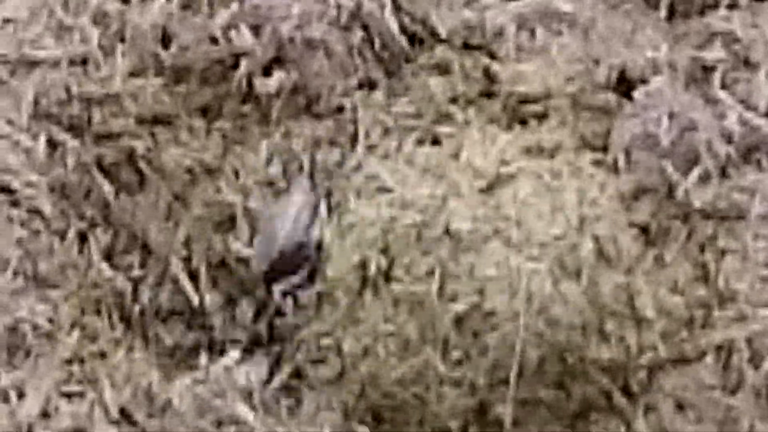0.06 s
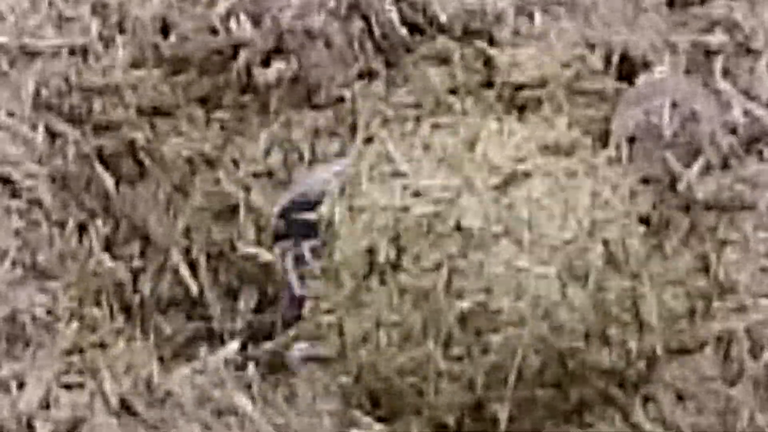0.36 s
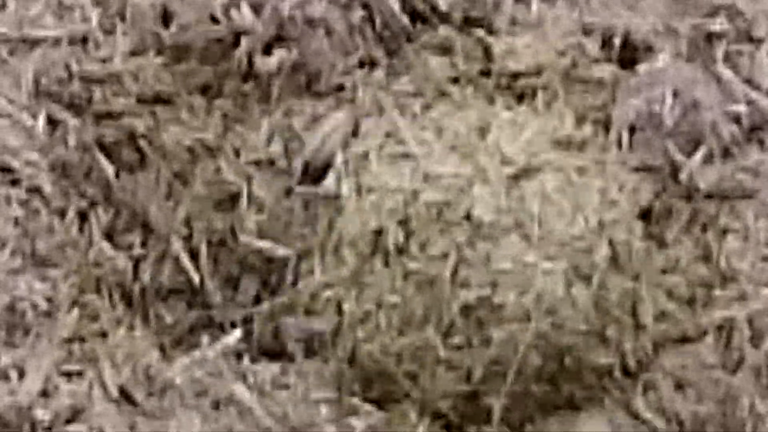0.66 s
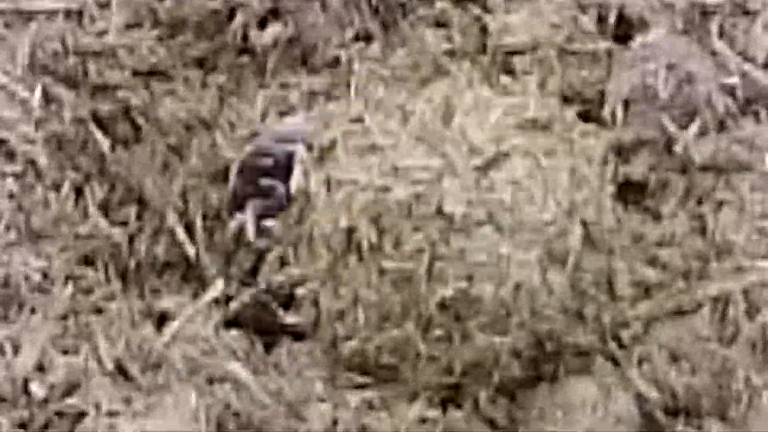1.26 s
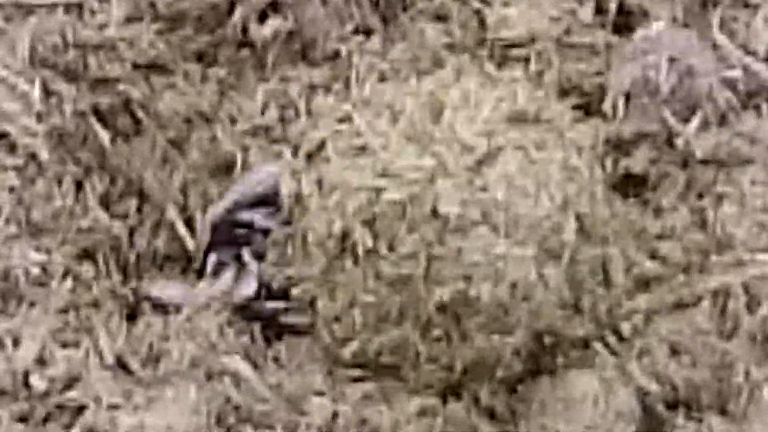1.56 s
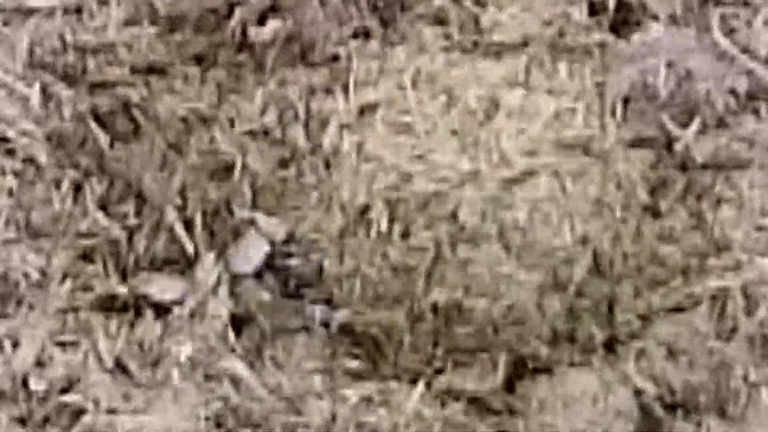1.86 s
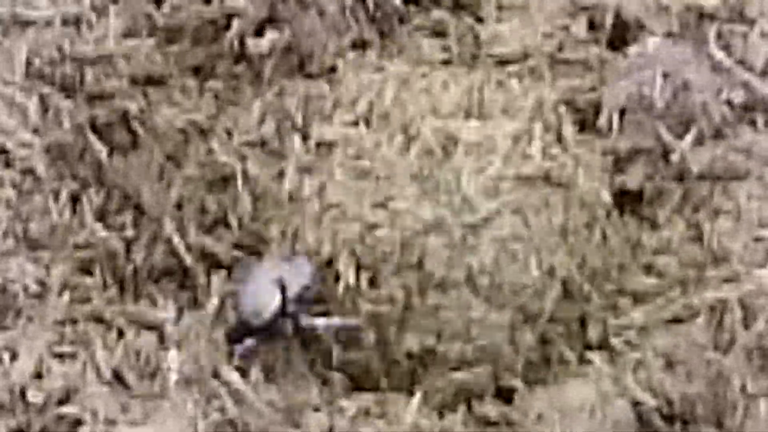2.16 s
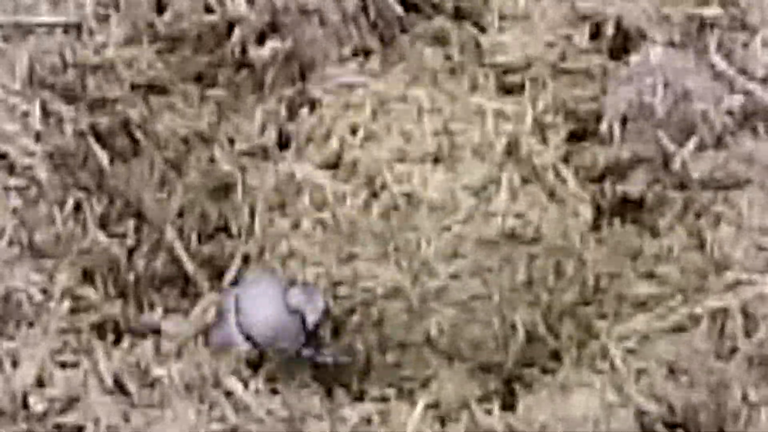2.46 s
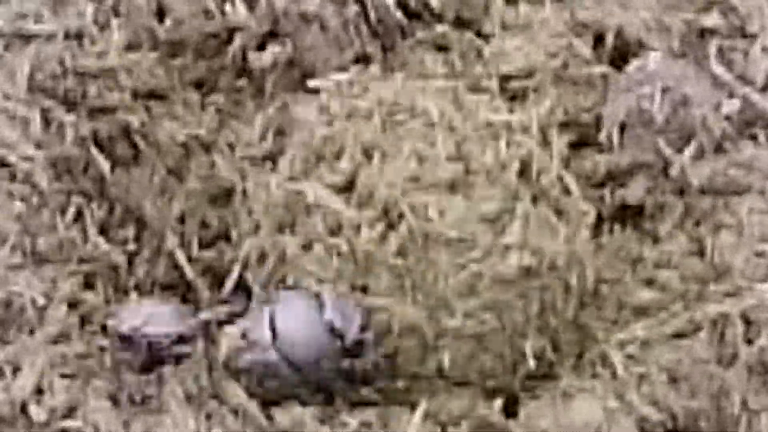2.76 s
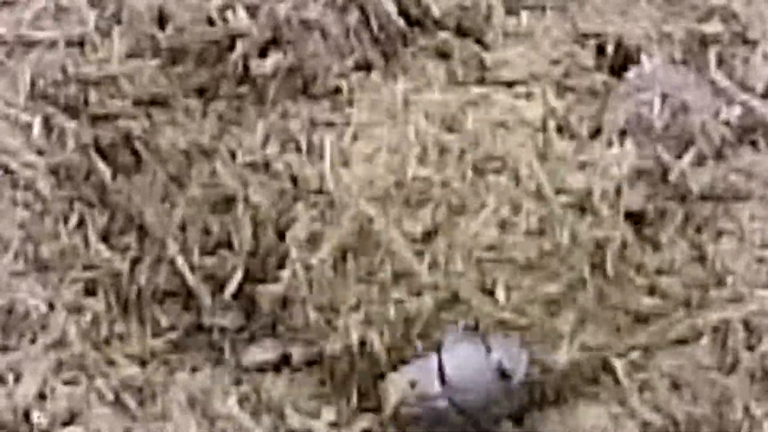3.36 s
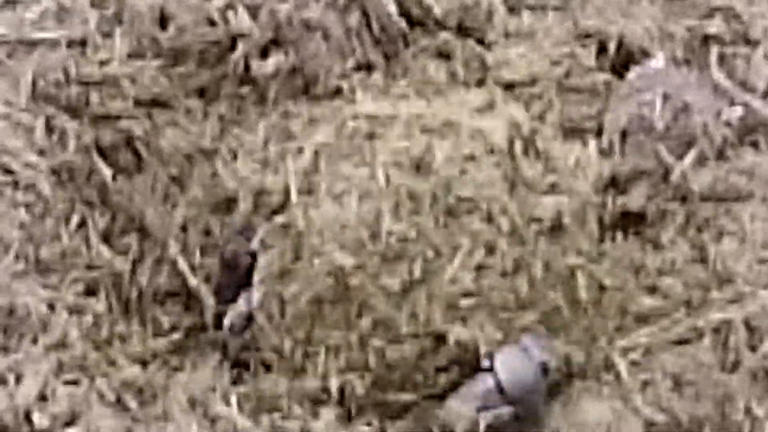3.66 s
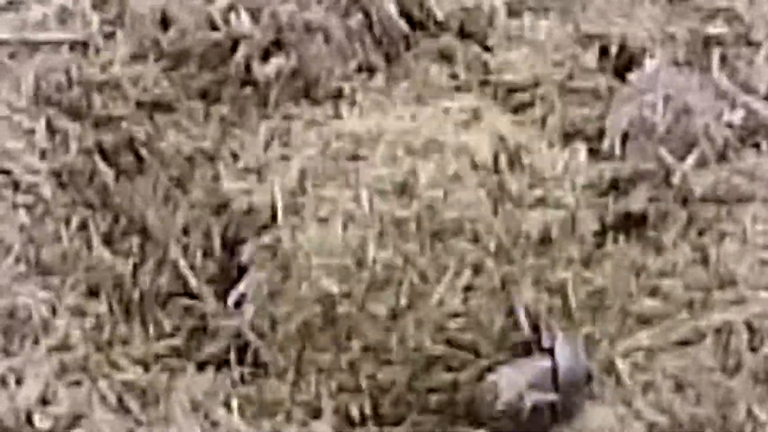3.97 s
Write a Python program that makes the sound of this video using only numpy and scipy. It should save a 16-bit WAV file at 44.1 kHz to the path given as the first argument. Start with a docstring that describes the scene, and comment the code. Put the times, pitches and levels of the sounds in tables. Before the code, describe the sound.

Wind thumps and rumbles on the left of the microphone, starting softly around 1 second, strongest from 2.7 to 3 seconds, then easing. Distant birds whistle and pip faintly over a soft outdoor hiss, with falling whistles from 2.3 seconds and three clearer buzzy chirps near the end. Close by, dry straw snaps lightly at 1.3 and 1.45 seconds, then rustles and crackles from 2.5 to 2.9.

```python
"""Birds and wind over dry ground

Out in the open, distant birds whistle, pip and chirp, their notes scattered by ground and bushes.
Wind thumps on the exposed left side of the microphone in puffs that grow stronger.
Close by, dry straw snaps twice, then rustles and crackles as the stalks rub together.
Under it all lie a soft hiss and the faint stutter of radio interference in the microphone."""
import sys
import numpy as np
from scipy import signal
from scipy.fft import rfft, irfft
from scipy.io import wavfile
from scipy.ndimage import uniform_filter1d

SR = 44100
rng = np.random.default_rng(int(sys.argv[2]) if len(sys.argv) > 2 else 0)


def file_out(sig):
    """Save sig as 16-bit WAV at sys.argv[1]."""
    # one column per channel
    cols = np.atleast_2d(sig).T
    # limit, then scale
    lim = np.clip(cols, -1, 1)
    pcm = np.round(lim * 32767).astype(np.int16)
    wavfile.write(sys.argv[1], SR, pcm)


N = 176400
TIME = np.arange(N) / SR
ECHO_T60_S = 0.35


def amp(db):
    """Decibels to gain."""
    return 10 ** (np.asarray(db) / 20)


def unit(x):
    """Scales to rms 1."""
    return x / np.sqrt(np.mean(x ** 2) + 1e-20)


def pan(left_db):
    """Left and right gains, the left louder by left_db."""
    return amp([[left_db / 2], [-left_db / 2]])


def level(points):
    """Gain over time from rows of time_s, level_db."""
    return amp(np.interp(TIME, *np.transpose(points)))


def shape(points, hz):
    """Gain over frequency from rows of frequency_hz, gain_db."""
    corner_hz, db = np.transpose(points)
    return amp(np.interp(np.log(hz + 1), np.log(corner_hz), db))


def colour(x, points):
    """Gives a signal a spectrum, at rms 1."""
    return unit(irfft(rfft(x) * shape(points, np.fft.rfftfreq(N, 1 / SR)), N))


def wander(rate_hz):
    """Smooth random motion, rms 1."""
    lowpass = np.exp(-(np.fft.rfftfreq(N, 1 / SR) / rate_hz) ** 2)
    return unit(irfft(rfft(rng.standard_normal(N)) * lowpass, N))


def add(mix, start_s, sound):
    """Mixes a sound in at a time, no earlier than zero."""
    part = mix[..., max(round(start_s * SR), 0):][..., :sound.shape[-1]]
    part += sound[..., :part.shape[-1]]


def echo(x, t60_s):
    """Diffuse scatter from ground and bushes, different on each side of the microphone."""
    t = np.arange(SR // 2) / SR
    tail = rng.standard_normal((2, len(t))) * amp(-60 * t / t60_s)
    return signal.fftconvolve(x[None], tail / np.linalg.norm(tail[0]), axes=1)[:, :N]


def open_air():
    """A soft, wide hiss whose level barely moves."""
    hiss_spectrum = [(20, -35), (60, 0), (200, -7.5), (430, -13.5), (1000, -12.5), (1500, -12.5),
                     (3000, -13), (4600, -16), (7000, -15), (9000, -16.5), (12000, -17), (15500, -18)]  # frequency_hz, gain_db
    hiss_level = [(0, -67), (1.1, -68), (1.9, -66), (2.6, -64.5), (3.45, -64.5), (4, -68.5)]  # time_s, level_db
    noise = rng.standard_normal((2, N))
    return colour(noise + 0.033 * noise[::-1], hiss_spectrum) * level(hiss_level)


def distant_chorus():
    """Birdsong from so far off that it blurs into a patchy haze."""
    haze_spectrum = [(1200, -24.5), (2000, -7), (2600, 0.5), (3300, -4.5), (3950, -3), (4500, -49),
                     (8000, -23)]  # frequency_hz, gain_db
    haze_level = [(0, -70.5), (.85, -69), (1.1, -81.5), (1.8, -73.5), (2.5, -71), (3.3, -72), (3.8, -62.5)]  # time_s, level_db
    hz, _, bins = signal.stft(rng.standard_normal((2, N)), SR, nperseg=512)
    patches = uniform_filter1d(rng.standard_normal(bins.shape[1:]), size=3, axis=0)
    patch_db = 5 * unit(uniform_filter1d(patches, size=7, axis=1))
    _, haze = signal.istft(bins * shape(haze_spectrum, hz)[:, None] * amp(patch_db), SR, nperseg=512)
    return level(haze_level) * unit(haze[:, :N])


def bird_note(length_s, pitches_hz, db, swell_db=0, dip_db=0, buzz=0, edge=0.17):
    """A near-sine note gliding through its pitches; any buzz shakes pitch and level, then eases off."""
    buzz_hz, buzz_depth = 208.5, 0.65
    t = np.arange(0, length_s, 1 / SR)
    progress = t / length_s
    drift, flutter = wander(rate_hz=75)[:2 * len(t)].reshape(2, -1)
    shake = buzz * (1 - progress ** 2) * np.sin(2 * np.pi * buzz_hz * t)
    glide = np.polyfit(np.linspace(0, 1, len(pitches_hz)), pitches_hz, len(pitches_hz) - 1)
    hz = np.polyval(glide, progress) * (1 + 0.0054 * drift) + 420 * shake
    envelope = np.sin(np.pi / 2 * np.clip(np.minimum(progress, 1 - progress) / edge, 0, 1)) ** 2
    contour_db = swell_db * progress - dip_db * np.sin(np.pi * progress) ** 2 + 1.8 * flutter
    envelope *= amp(contour_db) * (1 - buzz_depth * shake)
    return amp(db) * unit(envelope * np.sin(2 * np.pi * np.cumsum(hz) / SR))


def nearer_birds():
    """Birds some way off to the left slur, whistle, twitter and chirp, with echoes from the ground."""
    # long falling whistles: start_s, length_s, start_hz, middle_hz, end_hz, level_db, dip_db, swell_db
    slur_notes = [(2.346, .17, 6940, 5630, 4880, -69, 9, -4), (2.665, .135, 6980, 6100, 5100, -67, 0, -9),
                  (2.992, .2, 7020, 5670, 4050, -63.5, 9, 2), (3.341, .192, 6850, 5874, 3940, -53, 5.5, 10)]
    # clear whistles: start_s, length_s, start_hz, middle_hz, end_hz, level_db
    whistle_notes = [(-.03, 0.28, 2134, 2260, 2440, -76), (0.187, 0.13, 3470, 3350, 3070, -73),
                     (0.363, 0.094, 3200, 3180, 3050, -73.5), (0.477, 0.16, 3620, 3560, 3700, -73.5),
                     (1.682, 0.18, 6220, 6730, 7380, -84.5), (1.93, 0.23, 5680, 6940, 7350, -82),
                     (2.387, 0.08, 1390, 1586, 1840, -76), (2.488, 0.057, 4820, 4964, 4800, -59),
                     (2.909, 0.13, 3540, 3280, 3110, -73), (2.982, .053, 4890, 5150, 5050, -57),
                     (3.411, 0.11, 2750, 2736, 2910, -63), (3.485, 0.092, 2790, 2948, 3040, -61),
                     (3.652, 0.0565, 4290, 4140, 4100, -63.5), (3.754, 0.055, 1643, 1990, 2080, -69),
                     (3.862, 0.061, 1720, 1990, 1980, -68.5), (3.933, 0.068, 4600, 5020, 6900, -68)]
    # quick twitters: start_s, length_s, top_hz, fall_hz, level_db
    twitter_notes = [(1.269, 0.051, 4220, 199, -74), (1.317, 0.034, 4410, 600, -74),
                     (1.676, .03, 4150, 150, -77), (1.824, 0.044, 4400, 200, -71.5),
                     (1.881, 0.045, 4504, 50, -68.5), (1.929, .032, 4240, 400, -74),
                     (1.992, 0.026, 4430, 200, -71.5), (2.064, 0.047, 4230, 400, -75),
                     (2.287, 0.079, 3414, 50, -75), (2.385, .021, 5580, 910, -66),
                     (2.601, 0.022, 4080, 650, -61.5), (2.659, 0.01, 4050, 545, -56.5),
                     (3.048, .05, 4500, 774, -66), (3.083, 0.023, 4055, 510, -59.5),
                     (3.152, 0.009, 3850, 550, -60.5)]
    # buzzy falling chirps: start_s, length_s, five times pitch_hz, level_db, swell_db
    chirp_notes = [(3.7, 0.05, 4180, 3780, 3400, 2770, 2760, -50.5, -0.5),
                   (3.82, 0.038, 3630, 3437, 3184, 2860, 2800, -49, -4),
                   (3.931, .041, 3500, 3460, 3043, 2536, 2670, -48, -12)]
    slurs, whistles, chirps, blurred = np.zeros((4, N))
    for start, length, *pitches, db, dip, swell in slur_notes:
        add(slurs, start, bird_note(length, pitches, db, swell_db=swell, dip_db=dip, edge=0.2))
    for start, length, *pitches, db in whistle_notes:
        add(whistles, start, bird_note(length, pitches, db))
    for start, length, top, fall, db in twitter_notes:
        twitter = bird_note(length, (top, top - 0.318 * fall, top - fall), db)
        blur = np.interp(db, [-89.5, -71], [1, 0])  # the fainter, the farther and more diffuse
        add(whistles, start, np.sqrt(1 - blur) * twitter)
        add(blurred, start, np.sqrt(blur) * twitter)
    for start, length, *pitches, db, swell in chirp_notes:
        add(chirps, start, bird_note(length, pitches, db, swell_db=swell, buzz=0.55))
    direct = slurs * pan(9.5) + whistles * pan(13.5) + chirps * pan(10.5)
    song = slurs + whistles + chirps
    diffuse_twitters = echo(blurred, t60_s=0.48)
    early_scatter = amp(-6.5) * echo(song, t60_s=0.08)
    return direct + diffuse_twitters + early_scatter + amp(-13.5) * echo(song, ECHO_T60_S)


def farthest_birds():
    """Faint short notes at random times and pitches, reaching the microphone mostly as echo."""
    count, range_hz, glide_share = 70, (2353, 4244), 0.104
    notes = np.zeros(N)
    for when, height, slope, size in rng.random((count, 4)):
        glide = 1 + glide_share * (2 * slope - 1) * np.array([1, 0, -1])
        pitches = np.interp(height, [0, 1], range_hz) * glide
        add(notes, when * N / SR, bird_note(0.0218 + 0.0293 * size, pitches, db=-90.5))
    return notes + amp(15) * echo(notes, ECHO_T60_S)


def radio_interference():
    """Interference in the microphone: stuttering bursts of even ticks and a thin top-octave sizzle."""
    tick_spectrum = [(100, -5), (220, -4), (430, 2), (900, -2.5), (1400, -5.5), (2500, -15), (5000, -11),
                     (16000, -25)]  # frequency_hz, gain_db
    sizzle_spectrum = [(10700, -23), (11050, -3.5), (11900, -12.5), (12250, -14), (12900, -8), (13450, -17),
                       (13950, -7), (14700, -10), (15050, -4), (15350, -15), (15700, -2)]  # frequency_hz, gain_db
    sizzle_level = [(0, -80), (1.2, -71), (1.9, -63), (2.4, -69.5), (2.9, -71.5), (3.45, -60.5), (4, -76)]  # time_s, level_db
    tick_hz, ticks_per_burst, bursts = 216.67, 4, N * 60 // SR
    rests = 2.9 * rng.choice([0, 1, 1, 2], bursts) * rng.uniform(0.5, 1, bursts)  # in burst lengths
    ticks, slot = np.zeros(N), 0
    for rest in rests:
        for k in range(ticks_per_burst):
            add(ticks, (slot + k) / tick_hz, np.ones(1))
        slot += round(ticks_per_burst * (1 + rest))
    sizzle = colour(rng.standard_normal((2, N)), sizzle_spectrum) * level(sizzle_level) * pan(6)
    return amp(-76) * colour(ticks, tick_spectrum) * pan(5) + sizzle


def pipping_bird(first_s, period_s, count, pitches_hz, length_s, db, swell_db, echo_db):
    """A far bird repeats a two-step rising pip at an even pace, each trailing an echo."""
    pips = np.zeros(N)
    for k in range(count):
        add(pips, first_s + k * period_s, bird_note(length_s, pitches_hz, db, swell_db, dip_db=15.5))
    return pips + amp(echo_db) * echo(pips, t60_s=0.34)


def wind_on_microphone():
    """Puffs swing the exposed left port and settle to its ring, over a rumble; the right is sheltered."""
    buffets = [(1.075, -38.5, 112), (1.257, -39.5, 124), (1.275, -36, 86.5), (1.723, -32.5, 136),
               (1.911, -30, 111), (1.965, -29, 78), (2.0, -26, 102), (2.032, -30.5, 77.4),
               (2.069, -35, 116), (2.202, -33.5, 83), (2.282, -34.5, 121), (2.306, -30, 118),
               (2.387, -24.5, 187), (2.399, -26, 89), (2.474, -37, 100), (2.654, -31.5, 114),
               (2.696, -17, 109), (2.725, -24, 75), (2.774, -22.5, 66), (2.863, -22.5, 102),
               (2.891, -23, 88), (2.915, -25.5, 100), (2.978, -17, 113), (3.001, -11.5, 143),
               (3.071, -27.5, 91), (3.101, -33.5, 97), (3.188, -29.5, 82.4), (3.227, -27, 97),
               (3.308, -28, 140), (3.35, -31.5, 66.4), (3.407, -38.5, 102), (3.549, -26.5, 86.5),
               (3.665, -22.5, 105), (3.737, -26, 130), (3.839, -33.5, 75.4), (3.914, -28.5, 89),
               (3.946, -25.5, 88), (3.977, -29.5, 63)]  # crest_s, peak_db, pitch_hz
    rumble_spectrum = [(20, -54), (38, -19), (55, 5.5), (100, -1), (150, -9.5), (250, -20), (400, -30),
                       (600, -38.5), (2000, -106)]  # frequency_hz, gain_db
    rumble_level = [(0, -74.5), (.27, -56), (.38, -84), (.85, -67), (1.25, -48.5), (1.36, -63.5),
                    (1.98, -45), (2.52, -50), (2.72, -35.5), (2.83, -48), (3.0, -26.5), (3.14, -44.5),
                    (3.41, -43.5), (3.49, -59), (3.63, -44.5), (3.75, -48), (4, -45.5)]  # time_s, level_db
    port_hz, settle_s, rise_cycles, fall_cycles = 70, 0.01, 0.55, 0.85
    puffs, lead = np.zeros(N), SR // 32
    t = np.arange(-lead, SR // 10) / SR
    for crest, db, hz in buffets:
        cycles = np.cumsum(port_hz + (hz - port_hz) * np.exp(-np.maximum(t, 0) / settle_s)) / SR
        cycles -= cycles[lead]  # counted from the crest
        rise = (cycles / rise_cycles) ** 2
        fall = (np.hypot(cycles, 0.5) - 0.5) / fall_cycles
        envelope = np.exp(-np.where(t < 0, rise, fall))
        phase = 2 * np.pi * cycles
        skew = 0.36 * envelope ** 2 * np.cos(phase)  # the hardest swing is the steepest
        add(puffs, crest - lead / SR, amp(db) * envelope * np.cos(phase + skew))
    rumble = colour(rng.standard_normal((2, N)), rumble_spectrum) * level(rumble_level)
    rumble *= amp(4 * wander(rate_hz=41) - 0.5)  # gusts make it lumpy
    return puffs * amp([[0], [-40.5]]) + rumble * amp([[0], [-15.5]])


def straw_snaps():
    """Dry stalks break close to the microphone, each with a crack and a short ring."""
    breaks = [(1.286, -51, 5800, -8, -56), (1.294, -61, 4000, 4, -54), (1.449, -62, 5670, -12, -53.5),
              (1.451, -54, 2730, 10, -54), (2.556, -43, 1720, 0, -57), (2.573, -46, 2080, 2, -57),
              (2.783, -43.5, 5950, -8.5, -55), (2.802, -42, 5660, -8, -65), (2.882, -40.5, 2110, 4, -69)]  # start_s, ring_db, pitch_hz, left_db, crack_db
    decay_s, crack_band_hz = 0.0044, (1900, 9200)
    crack_filter = signal.butter(2, crack_band_hz, "band", fs=SR)
    t = np.arange(SR // 16) / SR
    snaps = np.zeros((2, N))
    for start, ring_db, hz, left_db, crack_db in breaks:
        noise = rng.standard_normal((2, len(t)))
        stalk = signal.iirpeak(hz, Q=5.5, fs=SR)
        ring = unit(signal.lfilter(*stalk, signal.lfilter(*stalk, noise + 0.11 * noise[::-1])))
        crack = unit(signal.lfilter(*crack_filter, noise))
        snap = (amp(ring_db) * ring + amp(crack_db) * crack) * np.exp(-t / decay_s)
        add(snaps, start, snap * pan(left_db))
    return snaps


def straw_rustle():
    """Nearby stalks rub in dense tiny grains and give two dull crunches as they are pressed flat."""
    rustle_spectrum = [(150, 8), (500, -4), (1000, -4.5), (1500, -8), (2200, -1), (3800, -0.5), (5200, -2),
                       (6500, -6), (7600, -9.5), (10000, -20), (16000, -31)]  # frequency_hz, gain_db
    rustle_level = [(2.1, -100), (2.3, -73), (2.53, -60), (2.575, -54), (2.64, -60), (2.71, -51.5),
                    (2.77, -56), (2.82, -54), (2.89, -53), (2.94, -62.5), (3.25, -67.5), (3.35, -66),
                    (3.6, -64.5), (4, -61.5)]  # time_s, level_db
    crunches = [(2.578, 0.013, -55), (2.884, 0.021, -54.5)]  # middle_s, half_length_s, level_db
    crunch_spectrum = [(150, -4), (500, 0.5), (2000, -7), (3500, -27)]  # frequency_hz, gain_db
    grains_per_s, spread_db = 3600, 2
    grains = rng.standard_normal((2, N)) * (rng.random((2, N)) < grains_per_s / SR)
    grains *= amp(spread_db * np.minimum(rng.exponential(1, (2, N)), 4))
    rustle = colour(grains, rustle_spectrum) * level(rustle_level) * pan(0.5)
    crunch = colour(grains[:, ::-1], crunch_spectrum)
    for middle, half_length, db in crunches:
        rustle += amp(db) * np.exp(-((TIME - middle) / half_length) ** 2) * crunch
    return rustle


def scene():
    """Birds in the distance, wind on the microphone, straw close by and open air all round."""
    high_pips = pipping_bird(first_s=0.134, period_s=0.2455, count=10, pitches_hz=(5000, 5350, 5950),
                             length_s=0.028, db=-83, swell_db=-3, echo_db=13.5)
    low_pips = pipping_bird(first_s=2.211, period_s=0.2795, count=7, pitches_hz=(3175, 3390, 4480),
                            length_s=0.025, db=-68.5, swell_db=-9, echo_db=7.5)
    birds = nearer_birds() + high_pips + low_pips + farthest_birds()
    return birds + wind_on_microphone() + straw_rustle() + straw_snaps() + open_air() + distant_chorus()


def record(dry):
    """The recorder picks up faint interference, then cuts the highest treble."""
    lowpass = signal.firwin(511, cutoff=15850, window=("kaiser", 9), fs=SR)
    return signal.oaconvolve(dry + radio_interference(), lowpass[None], "same")


dry = scene()
out = record(dry)
file_out(out)
```